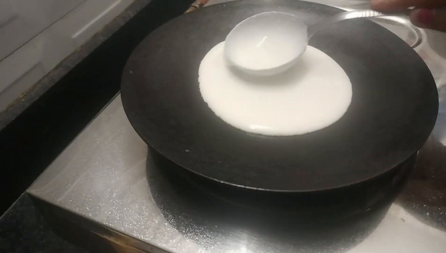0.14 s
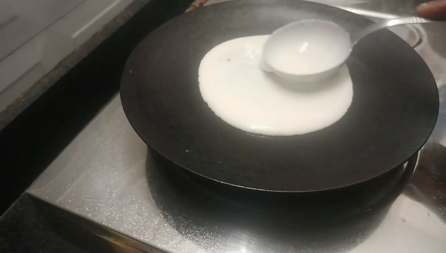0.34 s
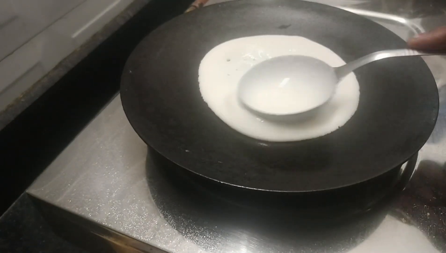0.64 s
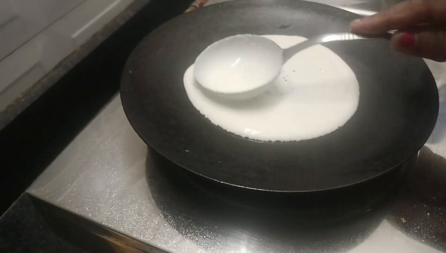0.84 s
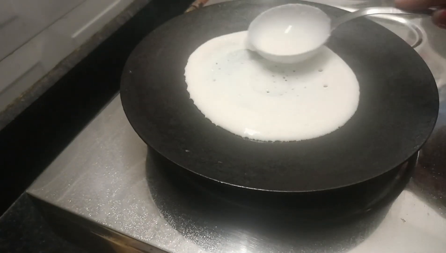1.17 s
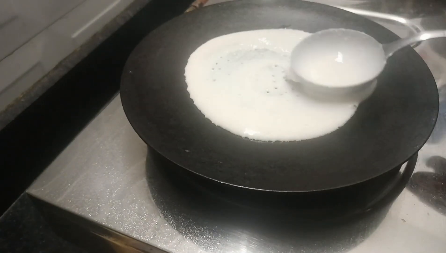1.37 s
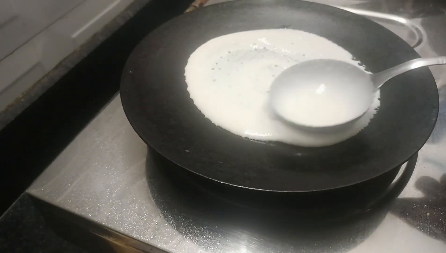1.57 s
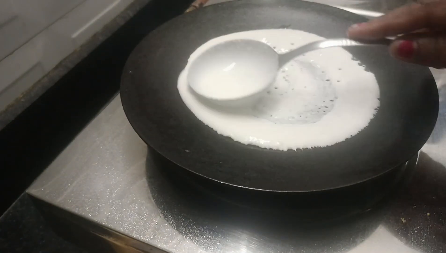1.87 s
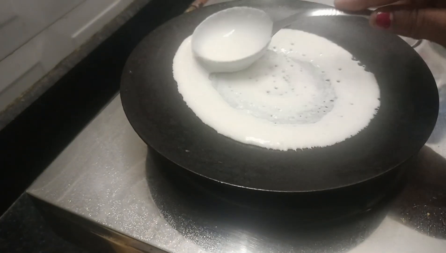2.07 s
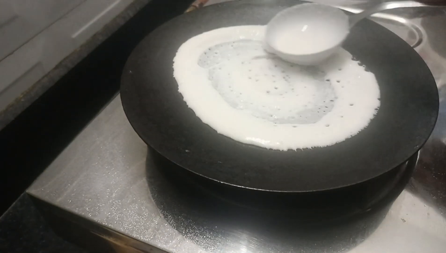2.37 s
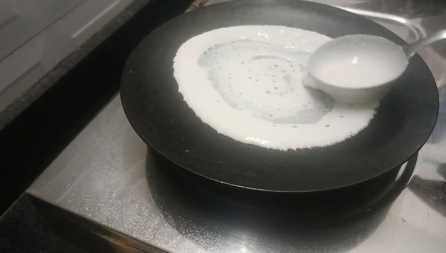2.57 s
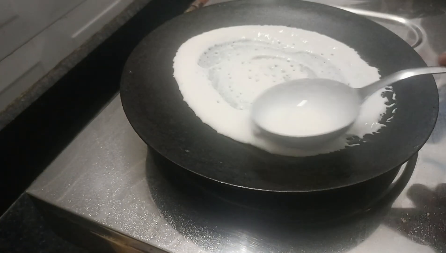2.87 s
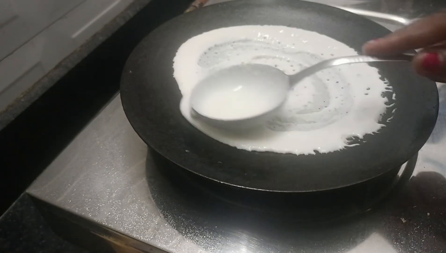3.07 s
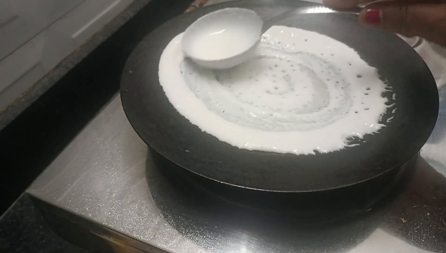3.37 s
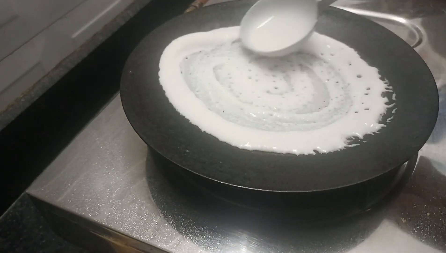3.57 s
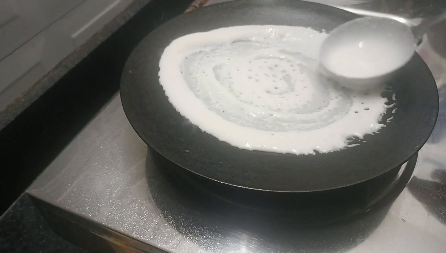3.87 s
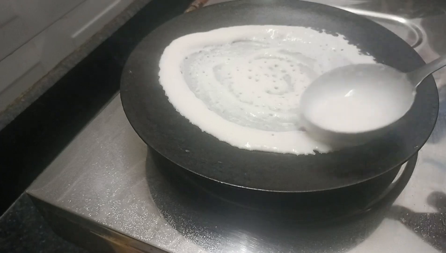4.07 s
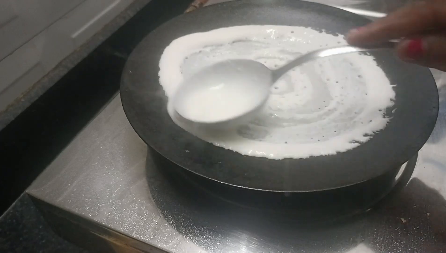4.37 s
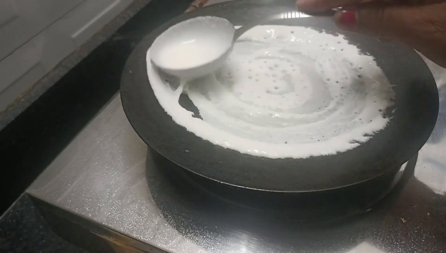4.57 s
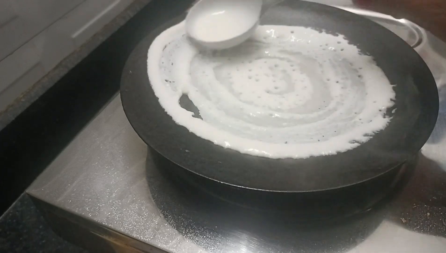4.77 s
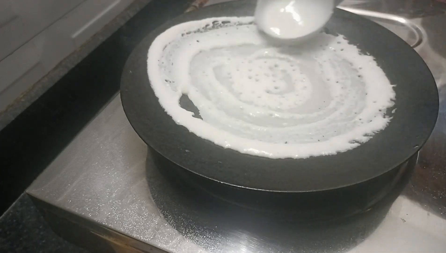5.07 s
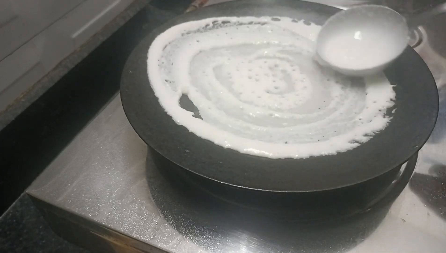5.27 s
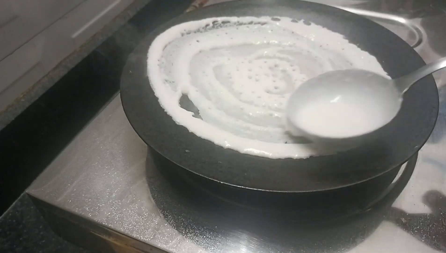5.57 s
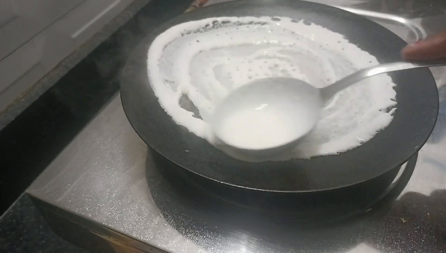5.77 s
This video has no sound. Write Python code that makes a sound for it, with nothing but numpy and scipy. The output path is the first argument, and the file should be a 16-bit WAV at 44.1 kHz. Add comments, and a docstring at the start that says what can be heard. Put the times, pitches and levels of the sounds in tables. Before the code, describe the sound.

Close in a small kitchen, batter sizzles continuously on a hot iron griddle, its bright hiss swelling and sinking. A ladle circles through it with low irregular judder, soft muffled knocks and faint, brief squeaks. Fine crackle and occasional sharp snaps sit above a quiet low stove drone. One close microphone, centered, with a very short room tail.

```python
"""Close by a hot iron griddle in a small kitchen, a steel ladle spreads batter in circles for six seconds.
From the start the stove drones low, and clicks filtered into bands make the hiss of bursting bubbles, swelling
and sinking as wet batter meets the iron. Random slips rock the stand under the ladle, and faint narrow noise
rings where it rubs; single squeaks soon stand out. From a third of a second on come soft decaying knocks
with a deep thud, and from half a second single sharp snaps of noise above a fine crackle."""
import sys
import numpy as np
from scipy import signal
from scipy.fft import rfft, irfft
from scipy.io import wavfile
from scipy.ndimage import uniform_filter1d

SR = 44100
rng = np.random.default_rng(int(sys.argv[2]) if len(sys.argv) > 2 else 0)


def inscribe(sig):
    """Save sig as 16-bit PCM at rate SR to the path in sys.argv[1].

    A 1-D sig is mono; a 2-D sig holds one channel per row.
    Samples are clipped to [-1, 1] before scaling.
    """
    pcm = np.round(np.clip(np.atleast_2d(sig).T, -1, 1) * 32767)
    wavfile.write(sys.argv[1], SR, pcm.astype(np.int16))


N = 261072
TIME = np.arange(N) / SR  # s

# Steam from the batter: (time [s], base level of the hiss [dB], base level of the wet sputter over it [dB])
STEAM = [(0.0, -47, -0.5), (0.18, -48, -2), (0.3, -51, -1), (0.39, -53.5, -1.5), (0.48, -51, -4.5),
         (0.63, -48.5, -2), (0.75, -45.5, -0.5), (0.97, -43.5, -0.5), (1.2, -45, -2.5), (1.43, -48.5, -3.5),
         (1.6, -45.5, -4), (1.8, -45.5, -1), (2.2, -41.5, -1.5), (2.45, -46, -2), (2.73, -45, -5),
         (2.88, -41.5, -5), (3.05, -46, -0.5), (3.2, -43, -0.5), (3.62, -47, 0.5), (3.85, -46, -5.5),
         (4.04, -48.5, -5.5), (4.17, -44.5, -5), (4.39, -45, 0), (4.47, -44, 2), (4.58, -43.5, -1),
         (4.74, -43, -0.5), (4.89, -39.5, -4), (5.1, -43.5, -3.5), (5.25, -47, -2), (5.5, -48.5, -6),
         (5.58, -52, -2), (5.635, -53.5, -1), (5.68, -46.5, -3), (5.92, -47, -2)]
# Bubbles grow and shrink as the ladle pushes wet batter outward: (time [s], pitch of the biggest [Hz])
BUBBLE_PITCH = [(0, 1560), (.2, 1490), (.33, 1670), (.48, 1950), (.63, 1840), (.73, 1470), (.8, 1330),
                (1.1, 1150), (1.43, 1640), (1.92, 1336), (2.15, 1060), (2.83, 1620), (3.3, 1110),
                (3.7, 1080), (4.15, 1590), (4.5, 1370), (5.22, 1235), (5.4, 1600), (5.5, 1700),
                (5.65, 1880), (5.76, 1820), (5.86, 1470)]


def from_db(db):
    """Decibels to gain."""
    return 10 ** (np.asarray(db) / 20)


def rms_one(x):
    """Scale to an rms of 1."""
    return x / np.sqrt(np.mean(x ** 2) + 1e-20)


def in_time(rows):
    """Columns of a curve, joined by straight lines."""
    s, *columns = np.transpose(rows)
    return [np.interp(TIME, s, column) for column in columns]


def at_hz(points, hz):
    """Read a spectrum on a log-frequency axis."""
    points_hz, levels = np.array(points).T
    return np.interp(np.log(hz), np.log(points_hz), levels)


def butter(x, hz, kind, order=2):
    """Butterworth filter."""
    sos = signal.butter(order, hz, kind, fs=SR, output="sos")
    return signal.sosfilt(sos, x + 1e-18)


def resonance(x, hz, width_hz):
    """One resonance with a gain of about 1 on top."""
    r = np.exp(-np.pi * width_hz / SR)
    feed = np.array([1, 0, -1]) * (1 - r * r) / 2
    feedback = [1, -2 * r * np.cos(2 * np.pi * hz / SR), r * r]
    return signal.lfilter(feed, feedback, x + 1e-18)


def moment(s, half_s):
    """Bell-shaped rise and fall around one time."""
    return np.exp(-.5 * ((TIME - s) / half_s) ** 2)


def drift(per_s):
    """Random values joined by straight lines, with an rms of 1."""
    knots = rng.standard_normal(size=2048)
    return rms_one(np.interp(TIME * per_s, np.arange(len(knots)), knots))


def grains(per_s, spread_db):
    """Clicks of either sign at random moments, their decibels spread exponentially."""
    sizes = from_db(spread_db * np.minimum(rng.exponential(1, N), 6))
    return (rng.random(N) < per_s / SR) * sizes * rng.choice([-1, 1], N)


def evened(x, span_s):
    """Hold the level near 1 over the span and keep the faster grain."""
    power = np.abs(uniform_filter1d(x ** 2, int(span_s * SR)))
    return x / np.sqrt(power + 1e-4 * np.mean(x ** 2))


def kitchen(x, t60=0.13, wet_db=-13):
    """Hard walls return a short, dense tail that falls 60 dB in t60 seconds."""
    t = TIME[:SR // 3]
    tail = rng.standard_normal(len(t)) * from_db(-60 * t / t60) * (t > .003)
    return x + from_db(wet_db) * signal.fftconvolve(x, tail / np.linalg.norm(tail))[:N]


def background(drone_hz=154.6, drone_width_hz=12.2, drone_db=-74, rush_level_db=-74.5, sizzle_share=0.39):
    """A low drone of the stove over a soft rush that swells a little with the boil."""
    # Quiet of the kitchen: (frequency [Hz], relative level [dB per Hz])
    rush_spectrum = [(30, -20), (60, -4.5), (120, -8.5), (220, -5.5), (320, -7.5), (430, -7), (520, -9),
                     (700, -11), (950, -9.5), (1200, -10.5)]
    drone = rng.standard_normal(N)
    for _ in range(2):
        drone = resonance(drone, drone_hz, drone_width_hz)
    drone = evened(drone, span_s=1.0)
    hz = np.arange(N // 2 + 1) * SR / N + 1
    rush = irfft(rfft(rng.standard_normal(N)) * from_db(at_hz(rush_spectrum, hz)), N)
    hiss_db = in_time(STEAM)[0]
    rush_db = rush_level_db + sizzle_share * (hiss_db - hiss_db.mean())
    return from_db(drone_db) * drone + from_db(rush_db) * rms_one(butter(rush, 1400, "low"))


def bubbles(low_hz, high_hz, per_s, spread_db, flicker_db, count, edge_db=52, shoulder_db=8):
    """One size class of steam bubbles: random bursts ring in count narrow bands, in the iron and the room."""
    # Bursts over pitch: (frequency [Hz], relative level [dB per Hz])
    burst_spectrum = [(900, 10), (1100, -7.5), (1400, -8), (1700, -2.5), (2050, -5), (2700, -2.5),
                      (3500, -0.5), (5200, 0.5), (6400, 0.5), (7600, -6), (9000, -5.5), (11500, -13.5),
                      (13700, -27), (15000, -10.5)]
    # Rings of the iron that colour the hiss: (frequency [Hz], width [Hz], lift [dB])
    iron_rings = [(1279, 18, 8), (1455, 16, 7), (1940, 24, 6), (2041, 30, 5), (2122, 22, 5), (2538, 26, 4),
                  (3429, 32, 4.5), (3548, 24, 4), (4219, 30, 3), (4510, 56, -2), (4688, 40, 2),
                  (6256, 35, 2), (6388, 45, 2.5), (6400, 790, 2.4)]
    edges, out, power = np.geomspace(low_hz, high_hz, count + 1), 0, 0
    lowest_hz, = in_time(BUBBLE_PITCH)
    for low, high in zip(edges, edges[1:]):
        hz = np.sqrt(low * high)
        level_db = at_hz(burst_spectrum, hz) + flicker_db * drift(18)
        bursts = rms_one(grains(per_s / count, spread_db)) * from_db(level_db)
        ringing = butter(bursts, [low, high], "band")
        power += np.mean(ringing ** 2)
        # bursts thin out by shoulder_db in the last octave down to the biggest bubbles,
        # and below those by edge_db per octave on top of that
        above = np.log2(hz / lowest_hz)
        thinning_db = shoulder_db * np.minimum(above - 1, 0) + edge_db * np.minimum(above, 0)
        out = out + ringing * from_db(thinning_db)
    present = np.sqrt(np.mean(out ** 2) / power)  # what the thinning leaves
    for hz, width_hz, lift_db in iron_rings:
        out = out + (from_db(lift_db) - 1) * resonance(out, hz, width_hz)
    return present * rms_one(kitchen(out))


def steam_pockets(hiss, length_s=0.043, width_hz=90, lift_db=6.5, count=170):
    """Small cavities open and close in the batter; each lends the hiss its own pitch for a moment."""
    out, size = hiss.copy(), int(length_s * SR)
    for when, pitch, strength in rng.random((count, 3)):
        start = int(when * (N - size))
        hz = 1600 * (7000 / 1600) ** pitch
        ring = resonance(hiss[start:start + size], hz, width_hz)
        gain = from_db(lift_db * np.sqrt(strength)) - 1
        out[start:start + size] += gain * np.hanning(size) * ring
    return out


def swelling(hiss):
    """Bands of the hiss flare up or go hollow and come back."""
    # Passing bands: (time [s], half length [s], frequency [Hz], width [Hz], lift [dB])
    swells = [(.33, 0.035, 1950, 700, -6), (0.502, 0.083, 1960, 900, -12), (0.532, 0.076, 3930, 220, -5),
              (.47, .05, 2350, 350, -1), (.6, 0.028, 2750, 600, -1), (0.636, .034, 2000, 600, -3),
              (.95, .04, 2700, 350, 3.5), (0.994, 0.055, 5500, 800, -3), (1.795, 0.057, 3150, 250, 4.5),
              (2.24, .05, 2050, 220, 0), (2.78, 0.11, 6800, 400, 3), (2.9, .07, 4500, 250, 5),
              (3.084, 0.12, 2100, 605, -5), (3.03, .06, 5800, 400, 1.5), (3.12, 0.044, 5350, 250, 4),
              (3.266, 0.067, 4000, 500, 4), (3.28, .07, 7240, 600, -3), (3.47, 0.1, 1670, 300, 5),
              (4.02, 0.15, 6940, 500, 2), (4.123, .04, 8250, 300, 6), (4.482, 0.032, 3200, 250, 2.5),
              (4.482, .05, 3650, 250, 4), (4.495, .06, 5400, 600, 5), (4.627, 0.045, 4200, 230, 7),
              (4.866, .05, 5000, 900, -5), (4.876, .04, 6350, 250, 5), (4.91, 0.026, 1940, 350, 2),
              (5.02, .06, 6400, 700, 2.5), (5.62, 0.042, 2930, 520, -33), (5.623, 0.031, 1620, 300, -4),
              (5.702, 0.036, 5030, 400, 3.5)]
    for s, half_s, hz, width_hz, lift_db in swells:
        hiss = hiss + (from_db(lift_db) - 1) * moment(s, half_s) * resonance(hiss, hz, width_hz)
    return hiss


def sizzle(usual_hz=1450, big_follows=0.39, spray_yields=0.24):
    """Thin batter fizzes high and bright; wet batter adds bigger, lower bubbles and smothers the finest spray."""
    # Topmost treble, before it yields to the sputter: (time [s], level over the hiss [dB])
    top_treble = [(0, -10), (.45, -18), (.68, -18), (.77, -12), (1.1, -12.5), (1.5, -15), (2.2, -15),
                  (2.4, -15), (2.6, -12), (3.1, -17.5), (3.65, -18), (3.85, -12), (4.21, -14),
                  (4.33, -17.5), (4.9, -15.5), (5.25, -15), (5.42, -14), (5.55, -20), (5.63, -30),
                  (5.67, -20), (5.92, -21.5)]
    hiss_db, wet_db = in_time(STEAM)
    swing_db = wet_db - wet_db.mean()
    deeper = np.log2(usual_hz / in_time(BUBBLE_PITCH)[0])  # octaves below the usual biggest bubbles

    big_db = -8 + 2 * deeper + big_follows * swing_db
    big = from_db(big_db) * bubbles(997, 1894, per_s=11000, spread_db=-1.5, flicker_db=3.0, count=8)
    middling_db = -6.5 - 2 * deeper + big_follows * swing_db
    middling = from_db(middling_db) * bubbles(1866, 2507, per_s=6000, spread_db=0.0, flicker_db=2.0, count=4)
    wet = from_db(wet_db - 0.92) * bubbles(2548, 4387, per_s=9000, spread_db=0.0, flicker_db=1.0, count=7)
    fine = from_db(-0.71) * bubbles(4347, 7600, per_s=13000, spread_db=-1.0, flicker_db=0.7, count=8)
    spray_db = -10.5 - spray_yields * swing_db
    spray = from_db(spray_db) * bubbles(7600, 11130, per_s=18000, spread_db=1.5, flicker_db=1.0, count=5)
    top_db = in_time(top_treble)[0] - spray_yields * swing_db + 1.2 * drift(30)
    top = from_db(top_db) * bubbles(11270, 15610, per_s=21000, spread_db=2.0, flicker_db=-0.5, count=4)

    # a weak boil is more ragged
    sputter_db = 0.5 * drift(21.94) * from_db(-0.5 * (hiss_db - hiss_db.mean()))
    hiss = swelling(steam_pockets(big + middling + wet + fine) + spray) + top
    return butter(hiss, 700, "high", order=4) * from_db(hiss_db + sputter_db)


def spits(ring_s=0.00031):
    """A fine crackle follows the hiss; now and then a blister snaps with a sharp, broad tick."""
    # Snapping blisters: (time [s], peak before the room and low cut [dB])
    snaps = [(.512, -38), (.726, -38), (.822, -33), (.902, -34), (.973, -34), (1.798, -42), (1.88, -37),
             (2.939, -30), (3.029, -32), (3.249, -32), (3.325, -30), (3.477, -27), (3.785, -35),
             (4.131, -37), (4.268, -33), (4.432, -32), (4.619, -34), (4.65, -32), (4.977, -34),
             (5.127, -26), (5.513, -36), (5.856, -35)]
    hiss_db = in_time(STEAM)[0]
    ticks = butter(grains(per_s=62, spread_db=0.5), [2200, 7500], "band")
    crackle = from_db(hiss_db - 16.0) * rms_one(ticks)
    t, out = TIME[:SR // 100], np.zeros(N)
    for s, db in snaps:
        snap = butter(rng.standard_normal(len(t)) * np.exp(-t / ring_s), [2500, 7500], "band")
        start = round(s * SR)
        out[start:start + len(t)] += from_db(db) * snap / np.abs(snap).max()
    return butter(kitchen(crackle + out, wet_db=-8), 1450, "high", order=4)


def through_stand(force, thinness, tilt_db=20, pivot_hz=190, cushion_hz=400):
    """Only the low rocking modes answer; thinner batter cushions less and favours the upper ones."""
    # Griddle rocking on its stand: (frequency [Hz], width before widening each pass [Hz], level before tilt [dB])
    stand_modes = [(60.6, 96, -10.5), (113.5, 25, 3.5), (156, 13, 7.5), (223.4, 54.5, 1.5), (292, 79, -10),
                   (419, 39, -17)]
    body = 0
    for k, (hz, width_hz, db) in enumerate(stand_modes):
        gain = from_db(db + tilt_db * (thinness - .5) * np.log2(hz / pivot_hz))
        pass_width_hz = width_hz * 1.64  # two passes narrow the mode again
        rocking = resonance(resonance(force, hz, pass_width_hz), hz, pass_width_hz)
        body = body + gain * (-1) ** k * rocking
    return butter(body, cushion_hz, "low", order=5)


def ladle_judder(slips_per_s=380, glide_db=-76.5, glide_thinness=0.24, flutter_db=2.5):
    """The ladle sticks and slips at random through the batter; each drag builds, holds and lets go."""
    # Drags on the griddle: (start [s], length [s], level before flutter [dB], batter [0 deep to 1 scraped thin])
    drags = [(0.36, 0.018, -57.5, .57), (.65, .05, -69, .8), (1.29, .062, -41, 0.78),
             (1.692, 0.074, -62.5, 1), (1.883, 0.038, -57.5, 0.19), (2.34, 0.1, -58, 0.39),
             (2.534, .027, -45.5, 0.42), (2.9, .07, -57, 0.36), (2.994, .12, -50, 0.66),
             (3.15, 0.085, -53, 0.68), (3.27, 0.26, -57.5, .25), (3.602, .2, -59, 0.069),
             (4.135, .035, -62.5, .15), (4.24, 0.16, -51.5, 0.58), (4.408, 0.19, -53.5, 0.29),
             (4.902, .1, -58, 0.055), (5.235, 0.095, -50, 0.57), (5.718, .23, -51.5, 0.51)]
    attack_db_per_s, release_db_per_s = 267, 296
    power = from_db(glide_db) ** 2  # between drags the ladle glides
    thin_power = power * glide_thinness
    for s, length_s, db, thinness in drags:
        before_s, after_s = np.maximum(s - TIME, 0), np.maximum(TIME - s - length_s, 0)
        drag = from_db(db - attack_db_per_s * before_s - release_db_per_s * after_s) ** 2
        power, thin_power = power + drag, thin_power + drag * thinness
    judder = through_stand(grains(slips_per_s, spread_db=1.0), thin_power / power)
    return from_db(flutter_db * drift(24)) * np.sqrt(power) * evened(judder, span_s=0.066)


def rubbed(hz, width_hz, wander=0.012, steady_s=0.041):
    """A narrow ring fed by friction, at an even level; its pitch wanders with the contact."""
    phase = 2 * np.pi * np.cumsum(hz * (1 + wander * drift(20))) / SR
    # slow noise on both quadratures spreads the ring around its pitch
    a, b = butter(rng.standard_normal((2, N)), width_hz / 3, "low")
    return evened(a * np.cos(phase) + b * np.sin(phase), span_s=steady_s)


def ladle_rings(level_db=-7.0, reach_octaves=0.16, waver_db=5.5):
    """Ladle and iron sing faintly; each ring swells near its own bubble pitch and wavers with the contact."""
    # Rubbing rings: (frequency [Hz], nominal width [Hz], level before level_db [dB],
    # bubble pitch of the strongest ring [Hz])
    rub_modes = [(850, 100, -71.5, 1104), (1085, 79, -73, 1040), (1288, 40, -73.5, 1480),
                 (1440, 41, -78, 1700)]
    bubble_hz, out = in_time(BUBBLE_PITCH)[0], 0
    for hz, width_hz, db, best_hz in rub_modes:
        nearness = np.exp(-.5 * (np.log2(bubble_hz / best_hz) / reach_octaves) ** 2)
        gain = from_db(db + level_db + waver_db * drift(15))
        out = out + gain * nearness * rubbed(hz, width_hz)
    return out


def ladle_squeaks(rough_db=2.5, catches_per_s=70):
    """A ring swells, slides a little and fades as the contact passes over one spot; small catches roughen it."""
    # Low from the stand or high from the iron: (time [s], half length [s], frequency [Hz],
    # nominal width [Hz], level before roughening [dB], slide [Hz per s])
    squeaks = [(.055, .034, 1262, 35, -69.5, 2), (.33, 0.02, 1390, 44, -71, -700),
               (.455, 0.019, 160, 24, -62, 0.5), (.55, 0.022, 2280, 31, -70, 0),
               (.595, 0.022, 2005, 44, -66, -1), (.774, 0.016, 255, 40, -58, 0.5),
               (.809, 0.02, 1072, 32, -64, 500), (.827, 0.015, 160, 24, -60.5, 0),
               (.946, .021, 1207, 50, -59.5, 1), (1.11, 0.014, 970, 45, -67, 0),
               (1.53, 0.034, 158.4, 19, -61, 0), (1.535, 0.02, 1570, 45, -67, -2.5),
               (1.547, 0.037, 1290, 48, -64.5, 0), (1.648, .014, 1260, 45, -70, 2),
               (2.035, .02, 1083, 41, -65, -1), (2.144, 0.029, 1090, 74, -61.5, -900),
               (2.16, .022, 810, 46, -69, -700), (2.26, 0.036, 885, 43, -66, -0.5),
               (2.31, .025, 1280, 55, -66, 0), (2.372, 0.03, 890, 40, -70, 300),
               (2.476, 0.013, 164, 30, -52, 1), (2.674, 0.055, 158, 19, -64, -0.5),
               (2.753, .028, 1307, 56, -72, 0), (2.878, .014, 158.8, 32, -55, 1),
               (3.04, 0.022, 636, 30, -73.5, -2), (3.045, .02, 1285, 40, -65, 0),
               (3.17, 0.049, 1090, 44, -65.5, -600), (3.21, .028, 538, 33, -70.5, -0.5),
               (3.32, .022, 975, 40, -69, -500), (3.402, .025, 808, 45, -68, -0.5),
               (3.49, 0.055, 790, 70, -61, -200), (3.66, 0.065, 780, 67, -65, 146),
               (3.61, .03, 1150, 70, -64, 399), (3.88, .05, 882, 100, -72, 300.5),
               (4.44, 0.057, 1077, 52, -73, -1), (4.52, 0.04, 804, 30, -76, -300),
               (4.635, 0.042, 1100, 22, -64.5, 0), (4.765, 0.018, 155, 25, -58, -2),
               (4.8, 0.045, 1072, 38, -64, 2.5), (4.831, 0.017, 539, 21, -63, -0.5),
               (4.87, .055, 542, 22, -71, 1), (4.91, 0.023, 1090, 35, -69, -1),
               (5.01, .035, 1117, 53, -66, -1300), (5.051, .025, 810, 55, -73, -300),
               (5.168, .02, 1090, 50, -71, 901), (5.227, .016, 853, 30, -63, -2),
               (5.292, 0.03, 856, 32, -71, -2), (5.457, .005, 2190, 120, -54, -1),
               (5.86, .03, 1510, 170, -62, 0.5), (5.874, 0.03, 540, 28, -66.5, -3)]
    out = np.zeros(N)
    for s, half_s, hz, width_hz, db, hz_per_s in squeaks:
        sliding_hz = hz + hz_per_s * (TIME - s)
        out += from_db(db) * moment(s, half_s) * rubbed(sliding_hz, width_hz)
    return out * from_db(rough_db * drift(catches_per_s))


def ladle_bumps(rise_s=0.0071, thud_hz=80):
    """Riding over a cooked ridge gives a short cushioned knock with a deep thud under it."""
    # Soft bumps: (time [s], knock level before filtering [dB], knock pitch [Hz], thud relative to the knock [dB])
    bumps = [(.364, -42, 222, -22), (.384, -42.5, 197, -22), (1.27, -33, 198, -13), (1.286, -35, 222, -14),
             (1.298, -37.5, 186, -10), (1.322, -35, 248, -15), (1.346, -34.5, 242, -15),
             (1.359, -40, 264, -12), (1.368, -39, 195, -11), (1.745, -53, 250, -22), (1.772, -53, 340, -24),
             (2.34, -46, 235, -26), (2.39, -49, 175, -20), (2.436, -46, 180, -20), (2.502, -44, 150, -7),
             (2.523, -36.5, 255, -12), (2.539, -36, 165, -9), (2.564, -40.5, 260, -12),
             (2.928, -40.5, 175, -22), (2.95, -42.5, 165, -20), (3.005, -43, 215, -16),
             (3.022, -45, 200, -16), (3.06, -45, 240, -12), (3.087, -40, 225, -6), (3.108, -45, 140, -6),
             (3.203, -44, 230, -16), (3.224, -46, 230, -16), (3.474, -40.5, 149, -18),
             (3.585, -45.5, 133, -16), (3.652, -48, 160, -18), (4.224, -44, 170, -20),
             (4.246, -43.5, 170, -20), (4.29, -44.5, 250, -20), (4.31, -44.5, 295, -20),
             (4.393, -46, 205, -20), (4.408, -41.5, 209, -20), (4.468, -42, 215, -18),
             (4.522, -44, 190, -16), (4.554, -41.5, 165, -20), (4.908, -48, 130, -12),
             (5.231, -43, 270, -16), (5.26, -41, 235, -14), (5.277, -39, 205, -10), (5.316, -42, 235, -20),
             (5.745, -44.5, 280, -18), (5.783, -45.5, 190, -14), (5.812, -44.5, 200, -14),
             (5.862, -44.5, 150, -12)]
    t, out = TIME[:SR // 10], np.zeros(N + SR)
    swell = (t / rise_s * np.exp(1 - t / rise_s)) ** 3  # soft rise to 1, then decay
    for s, db, hz, thud_db in bumps:
        start = round(s * SR)
        knock = np.sin(2 * np.pi * hz * t)
        thud = from_db(thud_db) * np.sin(2 * np.pi * thud_hz * t)
        out[start:start + len(t)] += from_db(db) * swell * (knock + thud)
    return butter(butter(out[:N], 387, "low", order=5), 37, "high")


def scene():
    """One close microphone feeds both channels."""
    steam = sizzle() + spits()
    ladle = ladle_judder() + ladle_bumps() + ladle_rings() + ladle_squeaks()
    mono = steam + ladle + background()
    return np.stack([mono, mono])


def record(dry, cutoff_hz=15600):
    """The deep bass rolls off and the top is cut steeply."""
    thin = butter(dry, 26, "high")
    steep = signal.ellip(12, .1, 80, cutoff_hz, fs=SR, output="sos")  # 0.1 dB ripple, 80 dB down
    return signal.sosfilt(steep, thin)


dry = scene()
out = record(dry)
inscribe(out)
```